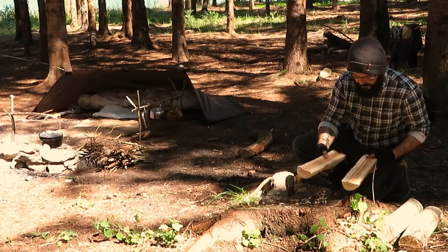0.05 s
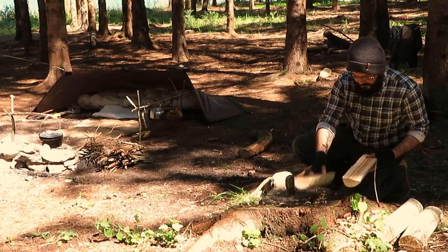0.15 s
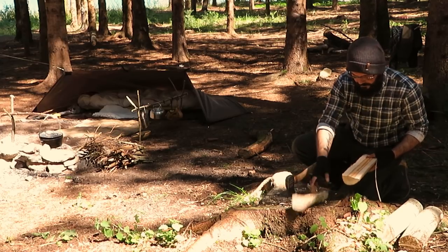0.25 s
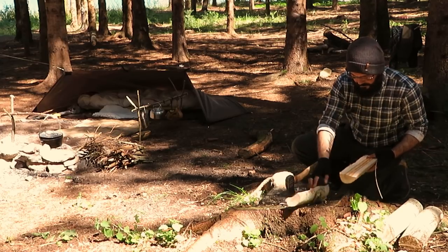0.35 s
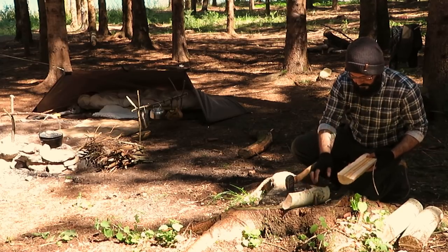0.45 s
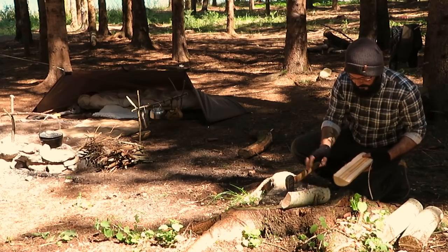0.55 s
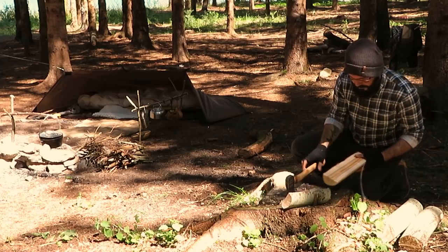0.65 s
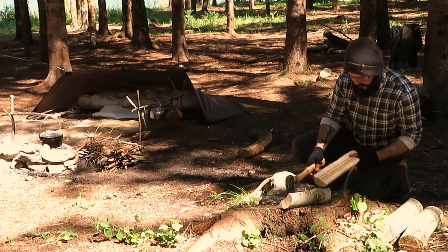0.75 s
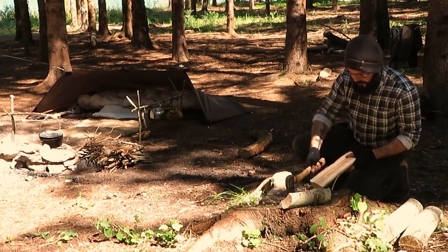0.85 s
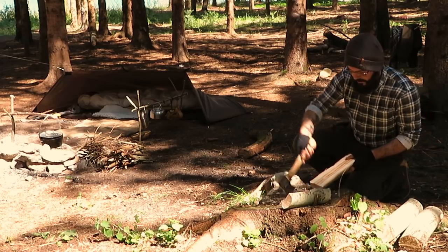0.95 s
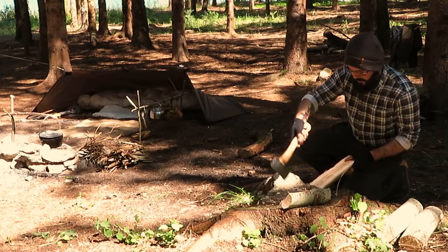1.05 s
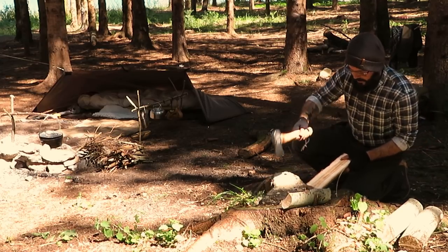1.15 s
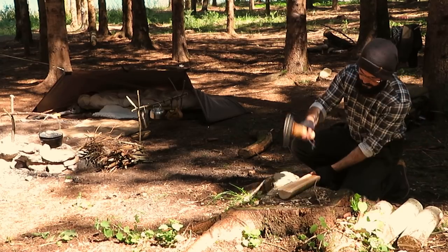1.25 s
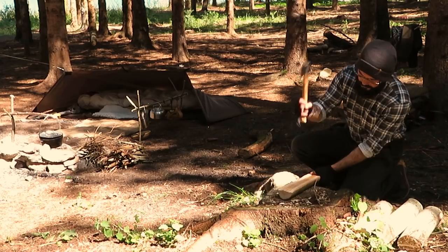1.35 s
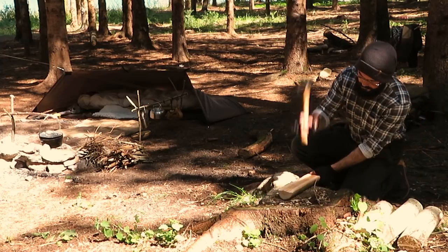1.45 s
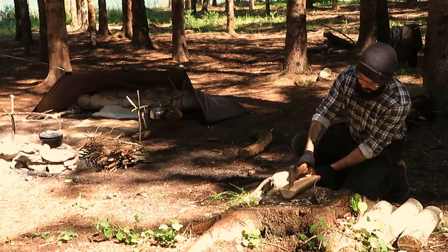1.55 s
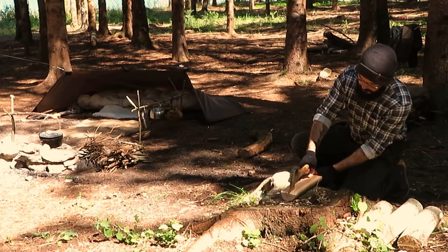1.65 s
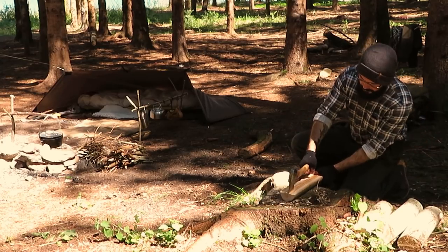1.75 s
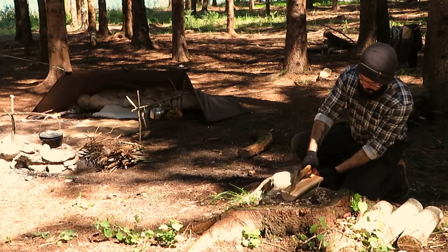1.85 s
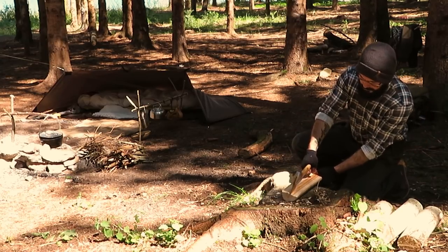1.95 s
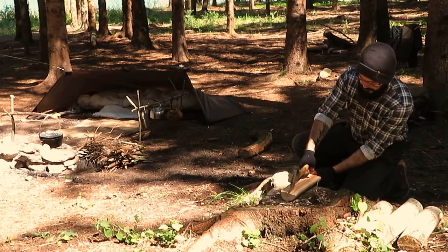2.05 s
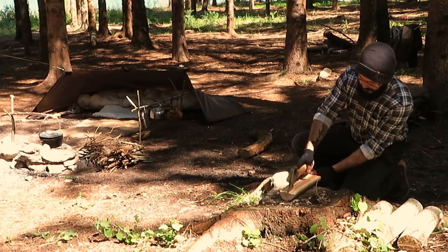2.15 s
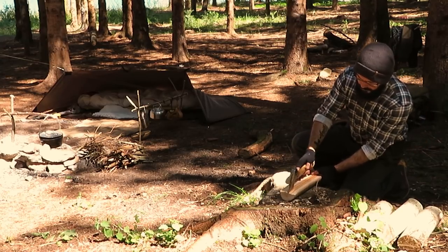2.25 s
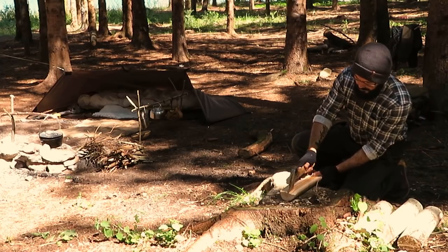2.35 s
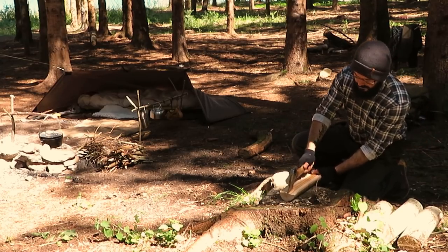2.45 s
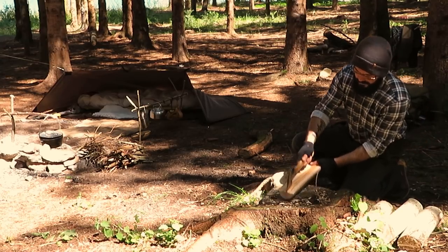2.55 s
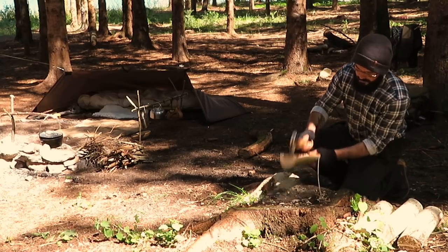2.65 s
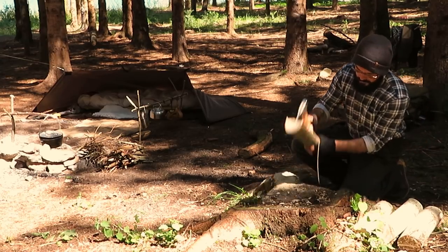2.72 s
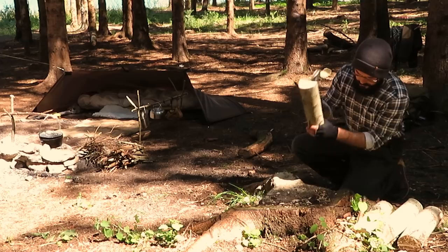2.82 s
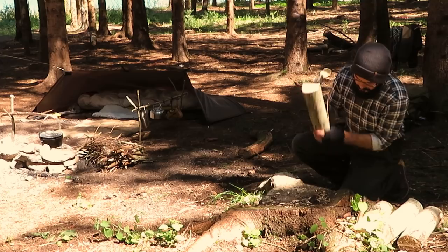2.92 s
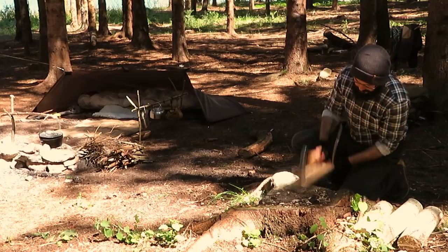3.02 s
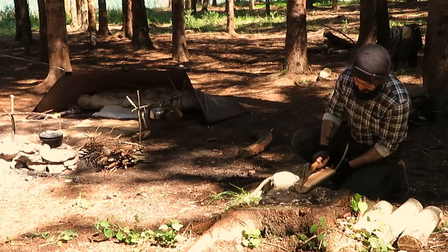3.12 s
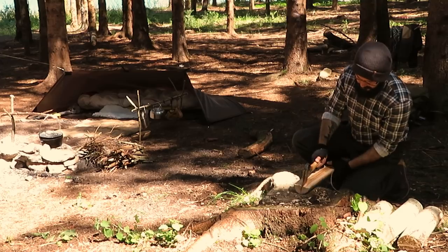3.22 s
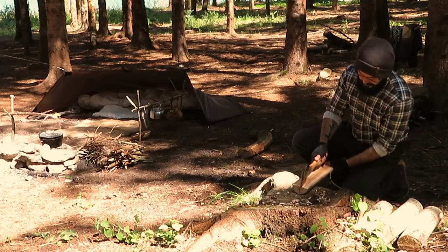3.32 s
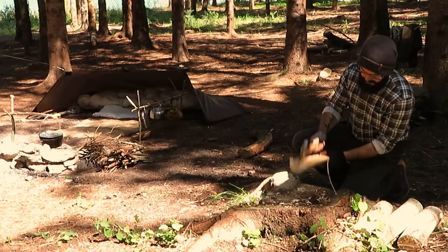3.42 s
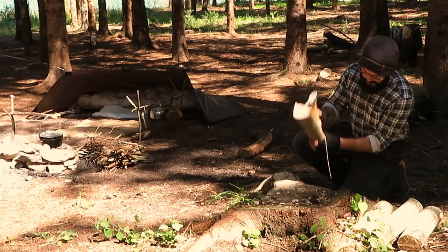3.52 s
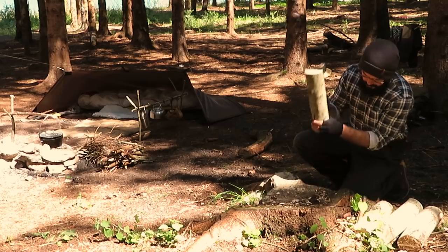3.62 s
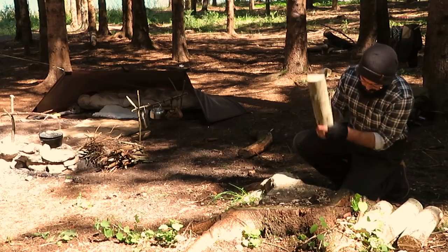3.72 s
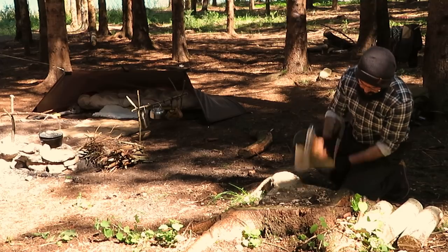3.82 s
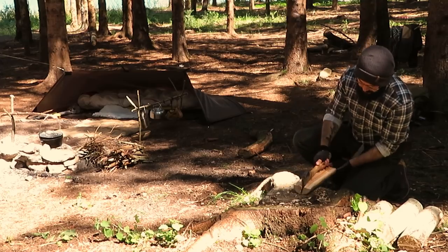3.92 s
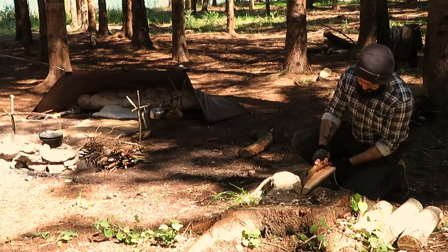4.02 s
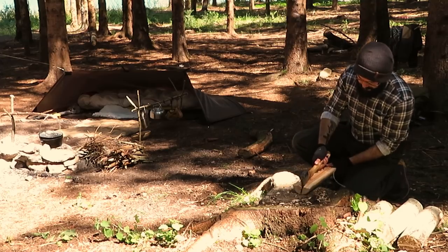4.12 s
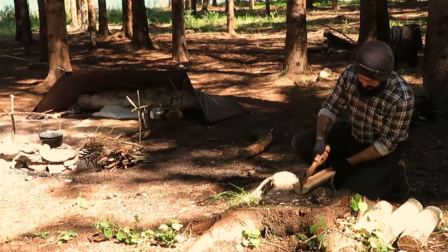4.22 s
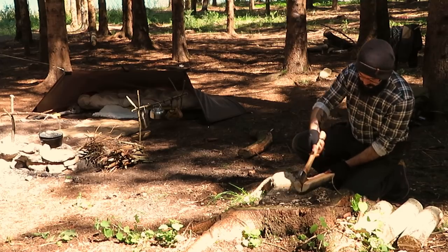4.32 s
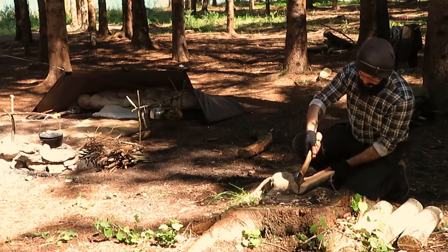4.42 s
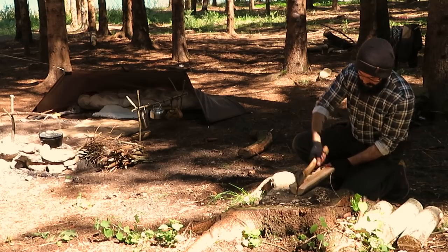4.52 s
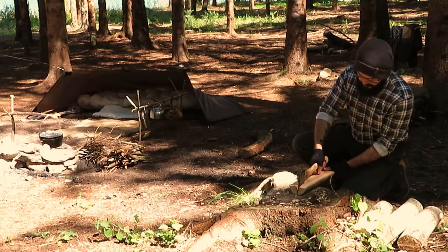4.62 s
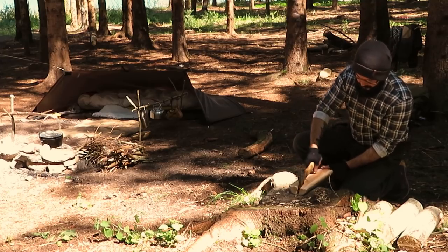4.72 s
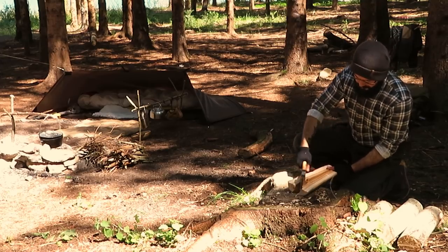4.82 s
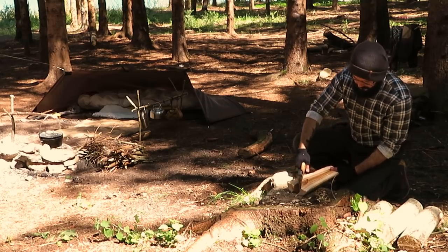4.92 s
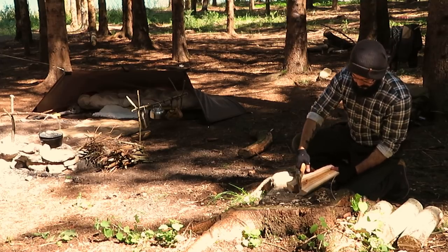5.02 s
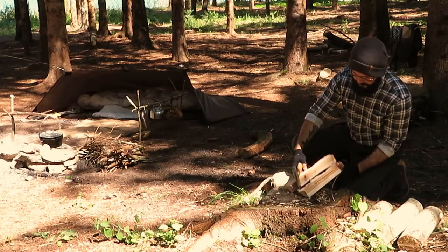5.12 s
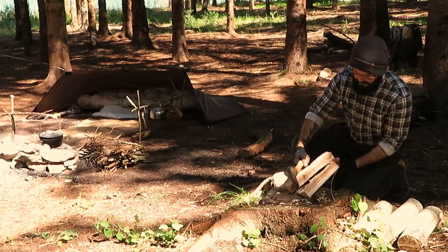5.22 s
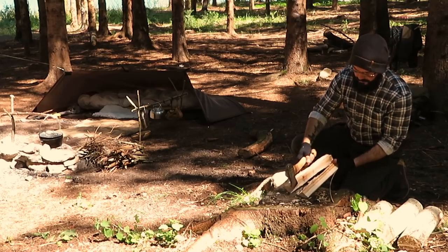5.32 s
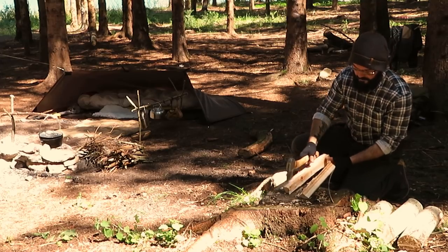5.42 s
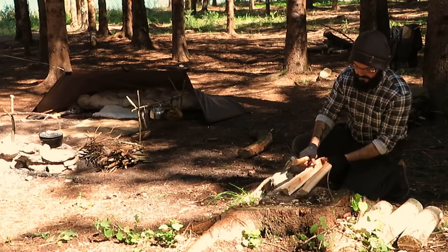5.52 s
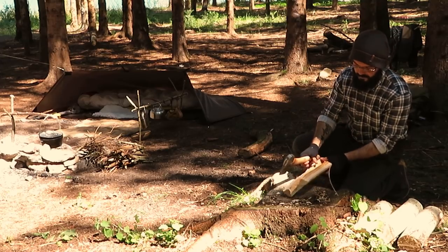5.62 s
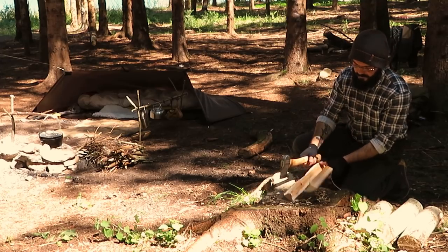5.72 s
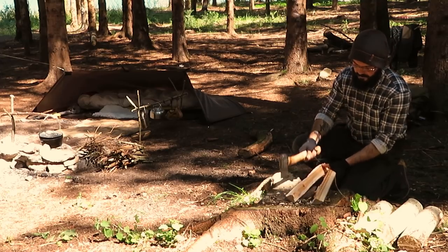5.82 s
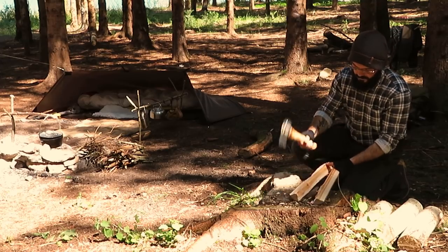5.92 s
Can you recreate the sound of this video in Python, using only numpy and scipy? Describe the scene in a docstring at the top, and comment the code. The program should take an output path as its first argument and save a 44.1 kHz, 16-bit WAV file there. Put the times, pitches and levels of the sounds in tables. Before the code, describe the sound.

In a conifer wood, a piece of wood lands on soft ground with a dull knock. After a few tiny ticks, three loud hatchet blows strike a short log, each clipping and ringing briefly off the trunks. A far bird trills between blows, then slurs downward. Finally a sharp snap and small splintering cracks open the log. Light wind sighs throughout; close stereo microphone with automatic gain.

```python
"""Three hatchet blows split a short log in a conifer forest, clipping and ringing among the trunks; before them
a piece of wood drops, after them small cracks. A small bird trills far off, a faint whistle sounds, wind sighs.
Wood is noise and clicks through ringing modes, trunks a noise tail, birds gliding sines, wind banded noise.
A gain control sinks after each blow and creeps back."""
import sys
import numpy as np
from scipy import signal
from scipy.io import wavfile

SR = 44100
rng = np.random.default_rng(int(sys.argv[2]) if len(sys.argv) > 2 else 0)


def output_pcm(signal):
    """Save a mono or channel-first signal as 16-bit PCM at the path in sys.argv[1].

    Samples are clipped to [-1, 1] before scaling.
    """
    pcm = np.clip(np.atleast_2d(signal).T, -1, 1) * 32767
    wavfile.write(sys.argv[1], SR, np.round(pcm).astype(np.int16))


N = 262836


def amp(db):
    """Decibels to gain."""
    return 10 ** (np.asarray(db) / 20)


def rms_one(x):
    """Scale to rms 1."""
    return x / np.sqrt(np.mean(x ** 2) + 1e-20)


def in_time(rows):
    """Curve of (t/s, value) at every sample."""
    return np.interp(np.arange(N) / SR, *np.transpose(rows))


def at_hz(points, hz, axis=1):
    """One table column read at a frequency, on a log frequency scale."""
    points = np.array(points)
    return np.interp(np.log(hz), np.log(points[:, 0]), points[:, axis])


def between(ends, share):
    """From the first value to the second as share goes 0 to 1."""
    return ends[0] + (ends[1] - ends[0]) * share


def drift(corner_hz):
    """Slow random curve of rms 1: noise through a two-pole low-pass, run at SR / 40."""
    r = np.exp(-80 * np.pi * corner_hz / SR)
    noise = rng.standard_normal(N // 40 + 2002)
    slow = signal.lfilter([1], [1, -2 * r, r * r], noise)[2000:]     # start-up dropped
    return np.interp(np.arange(N) / 40, np.arange(len(slow)), rms_one(slow))


def ring(x, hz, t60_s):
    """Damped mode: a unit click sets a sine of height 1 ringing."""
    r, w = amp(-60 / (t60_s * SR)), 2 * np.pi * hz / SR
    return signal.lfilter([0, np.sin(w)], [1, -2 * r * np.cos(w), r * r], x + 1e-18)


def cut(x, hz, kind, order=2):
    """Butterworth filter."""
    return signal.sosfilt(signal.butter(order, hz, kind, fs=SR, output="sos"), x)


def add(track, start_s, sound):
    """Mix a short sound into a track."""
    i = round(start_s * SR)
    track[i:i + len(sound)] += sound[:N - i]


def bands(size, gain, likeness):
    """Half-octave bands of stereo noise, each with its own gain(hz) and left-right likeness(hz)."""
    out, edges_hz = 0, 22 * 2 ** np.arange(0, 9.9, .5)
    white = rng.standard_normal((2, 2, size))
    for k, (low, high) in enumerate(zip(edges_hz, edges_hz[1:])):
        mid, side = cut(white[k % 2], [low, high], "band")
        hz = np.sqrt(low * high)
        alike = np.clip(likeness(hz), -1, 1)
        stereo = np.sqrt(1 + alike) * mid + np.sqrt(1 - alike) * side * [[1], [-1]]
        out = out + gain(hz) * stereo
    return out


def wind():
    """A broad sigh in the crowns, slightly patchy, and low lumps of air on the microphone."""
    # sigh spectrum: f/Hz, relative density/dB per Hz
    sigh_spectrum = [(15, -31), (25, -2), (39, -8.5), (66, -8.5), (97, -5), (236, -11), (451, -12.5),
                     (560, -15), (1070, -16), (1610, -22.5), (2050, -21.5), (6210, -31), (14400, -45),
                     (16000, -54)]
    # left-right likeness: f/Hz, correlation
    sigh_likeness = [(60, 0.99), (130, 0.99), (300, .2), (700, 0.5), (2400, 0.15), (8000, 0.2), (15000, .2)]
    # sigh strength: t/s, relative level/dB
    breeze = [(0, -2), (.8, -2.5), (1.5, -2), (2.2, -0.5), (3, -1), (4, 1), (4.7, -4), (5.2, -2), (6, -1.5)]
    # air on the microphone: t/s, level/dB
    gusts = [(0, -46.5), (.6, -57), (1.1, -47), (1.5, -52), (2.2, -78.5), (6, -76)]
    sigh_db = -45.5     # before the breeze curve
    together = drift(1.0)

    def band_gain(hz):
        return amp(at_hz(sigh_spectrum, hz) + .5 * together + .8 * drift(6))

    sigh = bands(N, band_gain, lambda hz: at_hz(sigh_likeness, hz))
    rumble = rms_one(cut(rng.standard_normal(N), [25, 70], "band"))
    lumps = rumble * amp(in_time(gusts) + 1.3 * drift(4.5))
    return amp(sigh_db + in_time(breeze)) * rms_one(sigh) + lumps


def echoes(x, rows):
    """Discrete reflections: delayed, duller copies from rows of (delay/s, level/dB)."""
    copies = 0
    for delay_s, db in rows:
        dull = cut(x, 7400, "low", order=1)
        copies = copies + amp(db) * np.roll(dull, round(delay_s * SR), axis=-1)
    return x + copies


def far(x, spread_s, wet_db):
    """A far source arrives with a dense smear of reflections, different at each side."""
    t = np.arange(SR // 2) / SR
    smear = rng.standard_normal((2, len(t))) * np.exp(-t / spread_s) / np.sqrt(spread_s * SR / 2)
    return x + amp(wet_db) * signal.fftconvolve(x[None], smear, axes=1)[:, :N]


def scatter(x, onset_s):
    """Sound scattered by many trunks: noise that swells, then dies band by band."""
    # trunk scatter: f/Hz, relative level/dB, t60/s
    forest = [(60, -30.5, 0.45), (160, -22, .45), (300, -23.5, 0.57), (596, -23.5, .4), (1580, -27, 0.9),
              (3000, -29, 0.75), (4500, -31, 0.42), (6500, -25, 0.15), (9000, -25, .17),
              (12000, -27.5, 0.14), (16000, -35, .1)]
    t = np.arange(SR) / SR

    def decay(hz):
        return amp(at_hz(forest, hz) - 60 * t / at_hz(forest, hz, axis=2))

    tail = bands(SR, decay, lambda hz: .95 - hz / 9000)
    tail *= amp(-24.0) * (1 - np.exp(-(t / onset_s) ** 2))
    tail *= amp(rms_one(cut(rng.standard_normal(SR), [10, 60], "band")))      # single trunks stand out
    return signal.fftconvolve(x[None], tail, axes=1)[:, :N]


def notes(rows):
    """Near sines that glide fast at first and settle on the end pitch; a quick uneven flutter blurs them."""
    out = np.zeros(N)
    for start_s, length_s, start_hz, end_hz, db, flutter_hz, bend in rows:
        u = np.arange(round(length_s * SR)) / (length_s * SR)
        flutter = rms_one(cut(rng.standard_normal(len(u)), [120, 260], "band"))
        hz = end_hz + (start_hz - end_hz) * (1 - u) ** bend
        hz += flutter_hz * (1 - u) * flutter
        swell = np.sin(np.pi * u) ** .7
        add(out, start_s, amp(db) * swell * np.sin(2 * np.pi * np.cumsum(hz) / SR))
    return out


def whistle():
    """A faint low whistle: two short rising glides, smeared by reflections."""
    # t/s, length/s, start f/Hz, end f/Hz, level/dB before smear, initial flutter/Hz rms, glide exponent
    whistle_notes = [(1.288, .035, 2008, 2061, -46.5, 14, 1.2), (1.352, 0.06, 2102, 2170, -49, 60, 1.1)]
    return far(notes(whistle_notes), 0.042, -1.5)


def trill_rows():
    """Rising notes that speed up; they climb, widen and swell until they settle."""
    start_s, count, settled_note = 1.907, 17, 11
    first_gap_s, last_gap_s, gap_shrink = .125, .0605, .665
    note_share = .52    # of the gap to the next note
    # first and settled note
    top_hz, sweep_hz, level_db = (7100, 7620), (40, 500), (-60, -50.5)
    flutter_hz, bend = 30, 4
    rows = []
    for k in range(count):
        grown = min(k / settled_note, 1)
        top = between(top_hz, grown)
        gap_s = between((last_gap_s, first_gap_s), gap_shrink ** k)
        from_hz = top - between(sweep_hz, grown ** 3)
        db = between(level_db, grown)
        rows.append((start_s, note_share * gap_s, from_hz, top, db, flutter_hz, bend))
        start_s += gap_s
    return rows


def flourish_rows():
    """Falling slurs, each higher than the last, with a short rising lead-in."""
    start_s, count, gap_s, slur_s, lead_s = 3.222, 5, .153, .092, .036
    # first and last slur
    from_hz, to_hz, lead_top_hz, lead_db = (7650, 8750), (7000, 7520), (7650, 8150), (-52, -57)
    lead_sweep_hz, slur_db, flutter_hz = 260, -53, 260
    lead_bend, slur_bend = 4, 1.8
    rows = []
    for k in range(count):
        s, up = start_s + k * gap_s, k / (count - 1)
        top, db = between(lead_top_hz, up), between(lead_db, up)
        rows.append((s - lead_s, lead_s, top - lead_sweep_hz, top, db, flutter_hz, lead_bend))
        rows.append((s, slur_s, between(from_hz, up), between(to_hz, up), slur_db, flutter_hz, slur_bend))
    return rows


def bird_song():
    """Trill, then flourish, with an echo and a smear of reflections; slightly louder at the left."""
    # trunk near the bird: delay/s, level/dB
    bird_echoes = [(.031, -5)]
    song = echoes(notes(trill_rows() + flourish_rows()), bird_echoes)
    return far(song, spread_s=.08, wet_db=-1) * amp([[-1.5], [-3]])


def drops():
    """A piece of wood lands: soft ground answers with a short low wavelet, a faint knock and a little grit."""
    # landings: t/s, push level/dB, push f/Hz, grit level/dB
    landings = [(0.3229, -22, 168, -41), (0.336, -5.5, 291, -35), (0.4655, -25, 188, -49.5)]
    out, t = np.zeros(N), np.arange(2048) / SR
    for start_s, push_db, push_hz, grit_db in landings:
        cycles = t * push_hz
        push = np.sin(2 * np.pi * 0.9 * cycles) * np.sin(np.pi * np.minimum(cycles / 1.8, 1)) ** 2
        strike = np.exp(-t / 0.00034) / (0.00015 * SR)
        knock = amp(-20.5) * sum(ring(strike, hz, 0.022) for hz in (750, 1080))
        grit = cut(rng.standard_normal(len(t)), [950, 7000], "band", order=1) * np.exp(-t / 0.0076)
        add(out, start_s, amp(push_db) * (push + knock) + amp(grit_db) * grit)
    return out


def splitting():
    """Snaps ring split-wood modes, most those near their centre, plus a bright tick; tearing crackles broadly."""
    # fibre snaps and wood ticks: t/s, ring level/dB, bright tick level/dB, ring centre f/Hz
    snaps = [(0.3203, -35.5, -45, 2350), (1.4806, -42, -45, 2500), (1.499, -39.5, -35.5, 2600),
             (1.59, -39, -36, 1800), (4.6141, -41.5, -69, 3460), (4.6217, -44, -55.5, 3200),
             (4.7523, -40, -64.5, 1823), (4.795, -33.5, -34, 2560), (4.815, -14, -9, 2000),
             (4.832, -38, -32, 3600), (4.8444, -26.5, -33, 2200), (4.8736, -43, -46, 2330),
             (4.8988, -29.5, -32, 2120), (5.0402, -38, -32.5, 3050), (5.0754, -28.5, -30.5, 2210),
             (5.1202, -57, -52, 2150), (5.2064, -43, -50, 3320)]
    # split wood: f/Hz, relative level/dB, t60/s
    split_modes = [(1450, -1, .016), (1800, -8, 0.011), (2210, -0.5, 0.014), (2750, -3, 0.0065),
                   (3345, 2.5, 0.0062), (4400, -7.5, .008)]
    # heaves on the handle, dense tiny clicks: peak t/s, half length/s, peak level/dB, ring centre f/Hz
    tearing_heaves = [(4.621, 0.018, -61.5, 3470), (4.747, 0.028, -60, 1740), (4.824, 0.049, -47, 3000),
                      (5.119, .03, -54, 2200), (5.2, 0.026, -62, 3300)]
    clicks_per_s = 2500
    fade_db = 20    # fall over one half length either side of the peak

    snap_s, ring_db, tick_db, centre_hz = np.transpose(snaps)
    at = np.round(snap_s * SR).astype(int)
    spread_db = rng.normal(0, 1.5, (len(snap_s), len(split_modes)))
    tiny = (rng.random(N) < clicks_per_s / SR) * amp(3 * np.minimum(rng.exponential(1, N), 4))
    tiny = tiny * rng.choice([-1, 1], N)
    heaves = []
    for peak_s, half_s, db, _ in tearing_heaves:
        away = (np.arange(N) / SR - peak_s) / half_s
        heaves.append(tiny * amp(db - fade_db * away ** 2))
    tearing = sum(heaves)
    out = amp(-8.0) * cut(tearing, [1500, 4500], "band", order=1)
    out += amp(8.5) * cut(tearing, 4980, "high")

    for k, (hz, db, t60_s) in enumerate(split_modes):
        clicks = np.zeros(N)
        for heave, row in zip(heaves, tearing_heaves):
            clicks += heave * amp(-1.0 - 13 * abs(np.log2(hz / row[-1])))
        off_centre_db = 3.5 * np.abs(np.log2(hz / centre_hz))
        clicks[at] += (-1) ** k * amp(ring_db + spread_db[:, k] - off_centre_db)
        out += amp(db) * ring(clicks, hz, t60_s)

    t = np.arange(256) / SR
    for start_s, db in zip(snap_s, tick_db):
        tick = rng.standard_normal(len(t)) * np.exp(-t / 0.00079)
        add(out, start_s, amp(db) * cut(tick, [4000, 10000], "band"))
    return cut(out, 870, "high", order=4)


def blows():
    """The blade stops in a few ms: a push rings log and root, breaking fibres knock and crack.

    Returns the stereo sound towards the microphone and its smooth average over all directions, for the trunks."""
    # hatchet blows: t/s, contact length/s, thump level/dB, upper log modes offset/dB, knock level/dB,
    # knock f/Hz, fibre crack level/dB, knock sent to the trunks/dB, highest knock modes offset/dB
    hits = [(1.5984, 0.0062, 0.5, -10.5, 4.5, 1450, -30, 22, 3),
            (3.106, 0.0055, 2.5, -3, 9, 2582, -8, 24.5, -4.5),
            (3.9254, 0.0057, -8, 0, 15.5, 1506, -4.5, 32.5, -6.5)]
    # log and root: f/Hz, relative level/dB, t60/s
    log_modes = [(245, -9.5, .012), (423, -4.5, 0.014), (482, 0.5, 0.01), (766, 1.5, 0.0096),
                 (1083, -8, 0.02)]
    # wedged piece: multiple of knock f, relative level/dB
    knock_modes = [(0.749, -10.5), (1.001, 5), (1.299, -1), (1.7, -9.5), (2.6, -6.5)]
    knock_t60_s = 0.0048
    out, around, t = np.zeros((2, N)), np.zeros(N), np.arange(4096) / SR
    push = np.sin(np.pi * np.minimum(t / 0.0011, 1)) ** 2 / (0.0018 * SR)
    click = (t == 0) * 1.0
    for start_s, length_s, thump_db, upper_db, knock_db, knock_hz, crack_db, around_db, top_db in hits:
        contact = np.sin(np.pi * np.minimum(t / length_s, 1))
        noise = rng.standard_normal((3, len(t))) * (contact + amp(-26.5) * np.exp(-t / 0.011))

        thump = np.zeros(len(t))
        for k, (hz, db, t60_s) in enumerate(log_modes):
            thump += (-1) ** k * amp(db + upper_db * (k > 1)) * ring(push, hz, t60_s)
        thump = cut(thump, 130, "high")      # a short log radiates little deep bass
        thump = thump / np.abs(thump).max()

        knock = np.zeros(len(t))
        for m, db in knock_modes:
            knock += amp(db + top_db * (m > 2)) * ring(noise[0], m * knock_hz, knock_t60_s)
        knock = knock / np.abs(knock).max()

        unlike = cut(noise[2], [200, 2500], "band", order=1)
        add(out[0], start_s, amp(-16.5) * unlike)
        add(out[1], start_s, -amp(-10.5) * unlike)
        # a faint low dip just before each blow
        dip = -amp(thump_db - 27.5) * np.sin(np.pi * np.minimum(t / 0.0021, 1)) ** 2
        for side, sign in zip(out, (1, -1)):
            add(side, start_s - .003, dip)
            # the cracks reach the two sides a little unlike
            crack = cut(noise[1] + sign * amp(-3.0) * noise[2], 2800, "high")
            crack = cut(crack, 3300, "low", order=1)
            add(side, start_s, amp(thump_db) * thump + amp(knock_db) * knock + amp(crack_db) * crack)

        # thump, knock, highest knock modes, crack: level/dB, band/Hz
        broad = np.zeros(len(t))
        for db, band_hz in ((thump_db + 28, [110, 900]),
                            (around_db, [.65 * knock_hz, 1.5 * knock_hz]),
                            (knock_db + top_db + 9.0, [2.3 * knock_hz, 2.5 * knock_hz]),
                            (crack_db + 24.0, [3500, 9000])):
            broad += amp(db) * cut(click, band_hz, "band", order=1)
        add(around, start_s + length_s / 2, broad)
    return out, around


def scene():
    """Woodwork near the middle, birds far off, wind all round."""
    # ground and nearest trunks: delay/s, level/dB
    near_echoes = [(.007, -28), (0.0133, -25.5), (0.0333, -30.5)]
    drop_around_db = -6.5   # the ground shades the drops from the trunks
    direct, around = blows()
    dropped, split = drops(), splitting()
    near = echoes(direct + dropped + split, near_echoes) * amp([[-.2], [.2]])
    near += scatter(around + amp(drop_around_db) * dropped + split, onset_s=0.025)
    return near + bird_song() + whistle() + wind()


def record(dry):
    """Slow gain control backs off after loud peaks, too late to save them from clipping; the top is cut."""
    release_db_per_s, attack_s, cutoff_hz = 9, .12, 16400
    t = np.arange(N) / SR
    level_db = 20 * np.log10(np.abs(dry).max(axis=0) + 1e-9)
    back_off_db = np.clip(1.456 * (level_db - 2), 0, 10)
    held_db = np.maximum.accumulate(back_off_db + release_db_per_s * t) - release_db_per_s * t
    r = np.exp(-1 / (attack_s * SR))
    smooth_db = signal.lfilter([1 - r], [1, -r], held_db)
    out = np.clip(dry * amp(-smooth_db), -.99, .99)
    out = cut(out, 35, "high")      # the coupling stage thins the lowest bass
    return signal.sosfilt(signal.cheby2(12, 70, cutoff_hz, fs=SR, output="sos"), out)


dry = scene()
out = record(dry)
output_pcm(out)
```